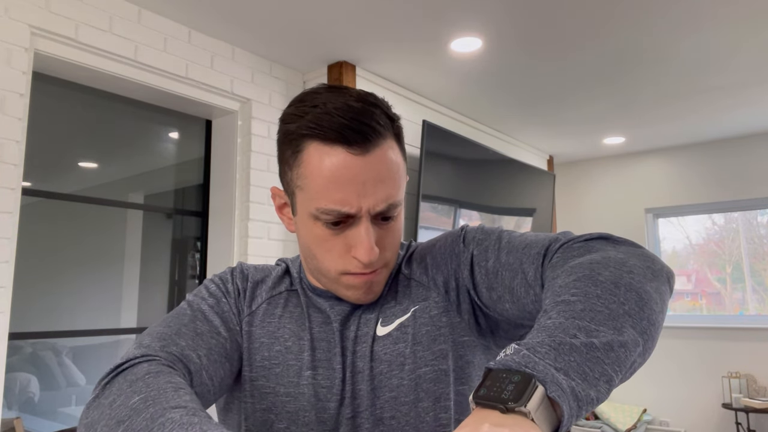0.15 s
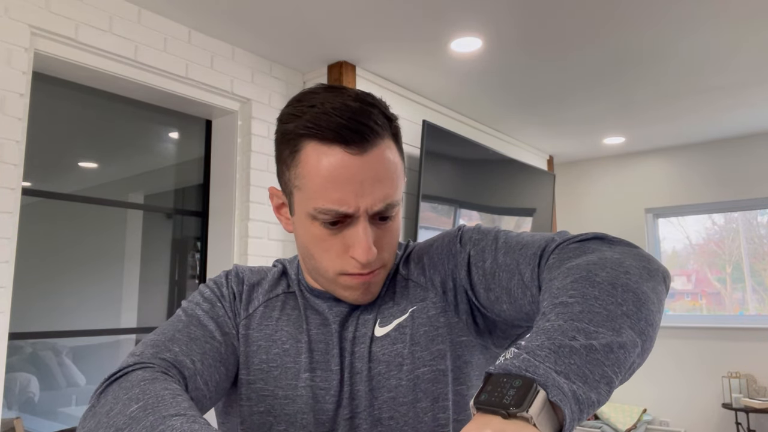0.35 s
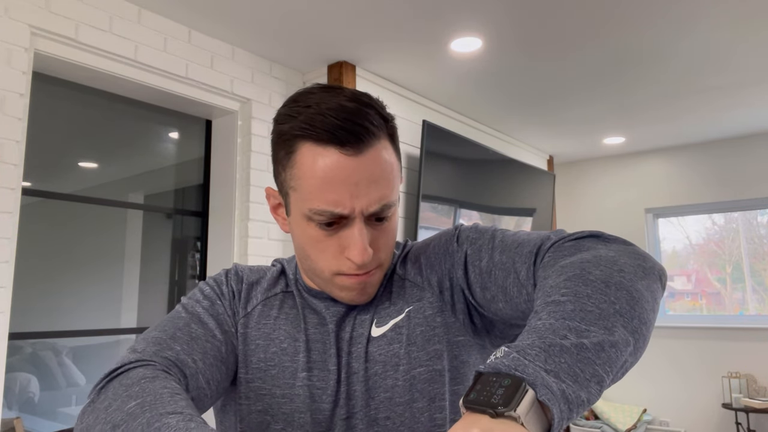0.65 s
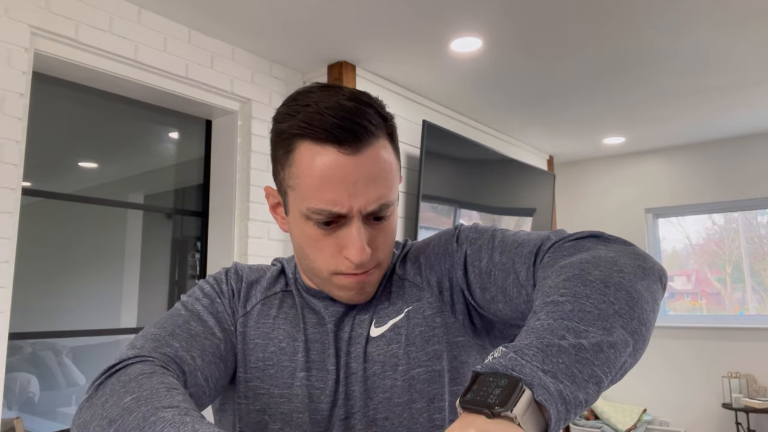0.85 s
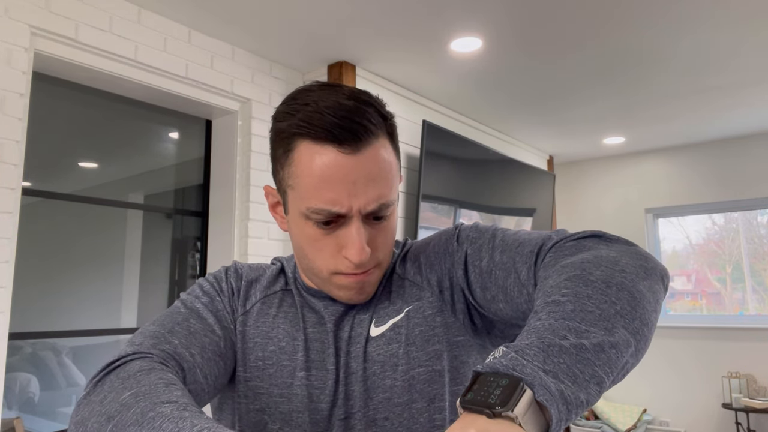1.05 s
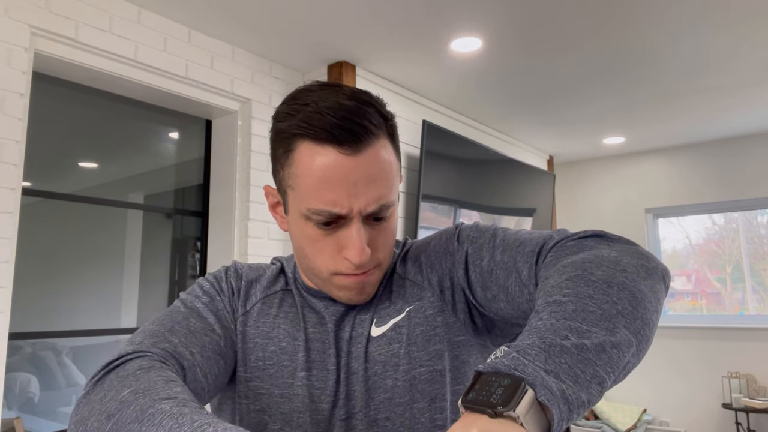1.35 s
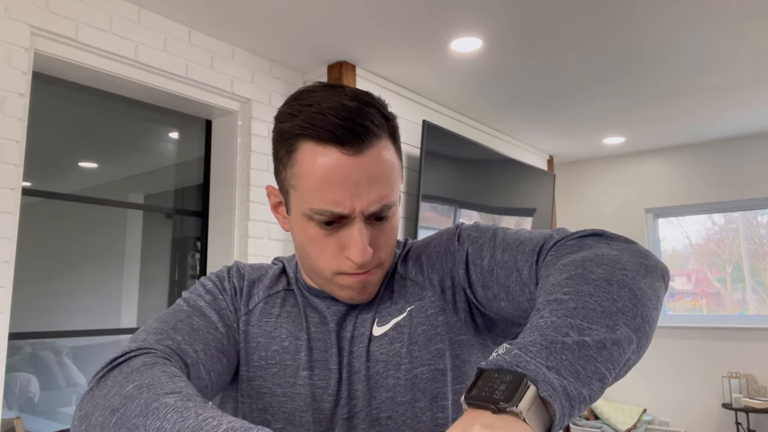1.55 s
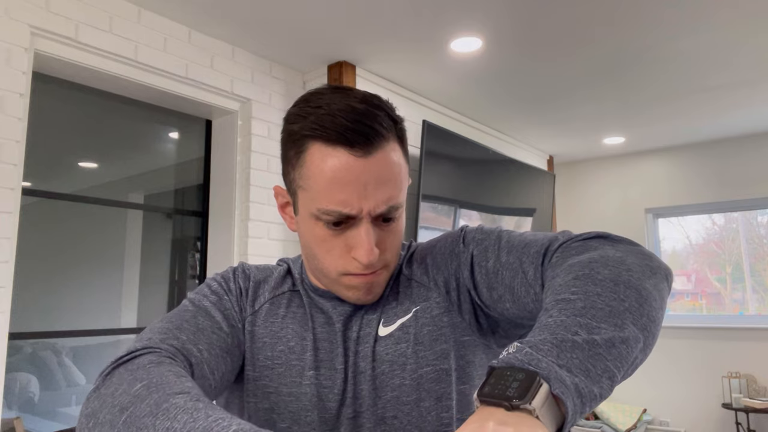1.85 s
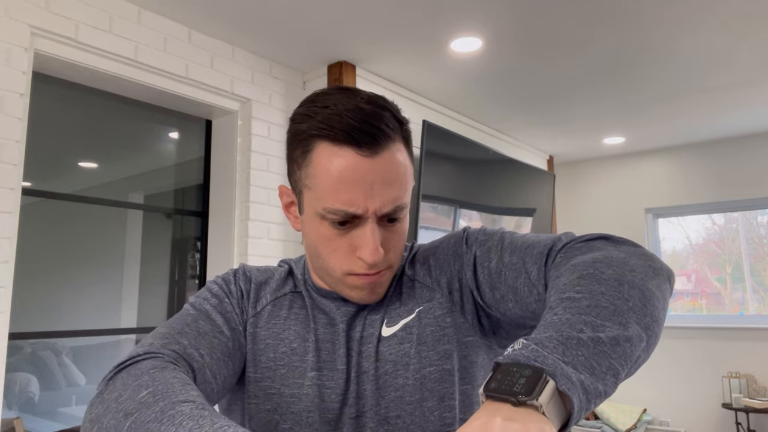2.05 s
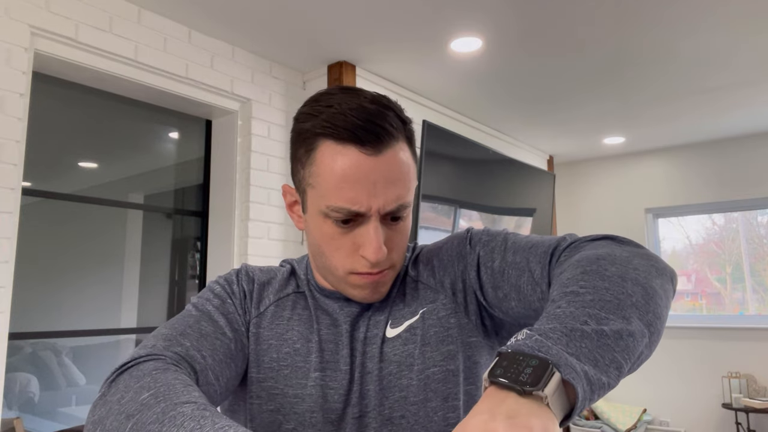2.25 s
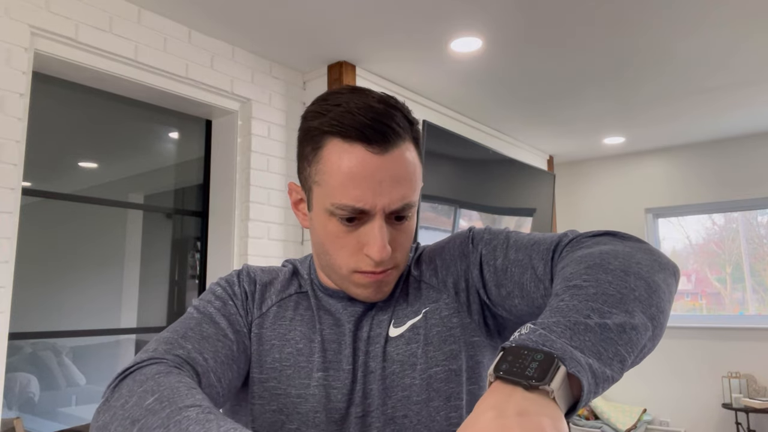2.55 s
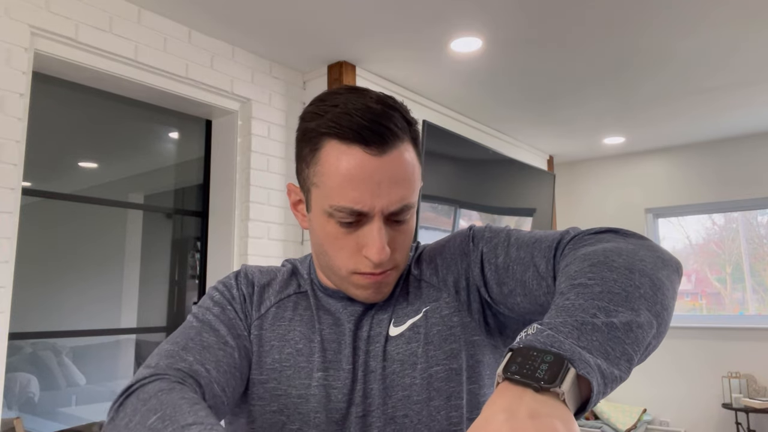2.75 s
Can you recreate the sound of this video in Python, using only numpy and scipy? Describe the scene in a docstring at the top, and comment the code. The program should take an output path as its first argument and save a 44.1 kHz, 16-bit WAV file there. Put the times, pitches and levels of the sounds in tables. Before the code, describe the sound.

Steel hand tools click and scrape on thin metal tabs at a table, sparse at first, sharp clacks around one second, a quieter pause, then another hard click near the end; lively room, close stereo microphones.

```python
"""In a hard-walled room, steel tools click and scrape on the tabs of a thin metal sheet on a table.
Each contact is roughened, shaped noise that excites the sheet's damped modes and the room's decaying tail;
low damped tones knock under some contacts, and ventilation rumbles softly as steady filtered noise.
A pair of microphones hears it all, the right one a little later above 500 Hz."""
import sys
import numpy as np
from scipy import signal
from scipy.fft import rfft, irfft, next_fast_len
from scipy.io import wavfile
from scipy.ndimage import uniform_filter1d

SR = 44100
rng = np.random.default_rng(int(sys.argv[2]) if len(sys.argv) > 2 else 0)


def transcribe(signal):
    """Save signal, clipped to [-1, 1], as a 16-bit WAV file at the path in sys.argv[1]."""
    frames = np.atleast_2d(signal).T
    limited = np.clip(frames, -1, 1)
    pcm = np.round(limited * 32767).astype(np.int16)
    wavfile.write(sys.argv[1], SR, pcm)


def volts_from_db(level):
    """Convert decibel levels to linear amplitude ratios."""
    exponent = np.asarray(level, float) / 20
    return 10 ** exponent


N = 127890  # length in samples

# Ventilation noise spectrum: (f/Hz, relative level/dB)
AIR_SPECTRUM = [(12, -53), (20, -17), (53, -13.5), (77, -1.5), (117, -11), (147, -2), (179, -5.5),
                (361, -8.5), (393, -15), (465, -7.5), (506, -22), (551, -18.5), (634, -21.5), (709, -19),
                (1080, -29.5), (1560, -31.5), (1740, -35), (2660, -45.5), (3830, -47), (6000, -55.5),
                (8650, -54), (11800, -57), (16500, -81)]
AIR_RMS_DB = -54.5  # before the microphones

# Reverberation time of the room: (f/Hz, t60/s)
ROOM_T60 = [(300, 0.93), (1000, 0.49), (2500, 0.39), (5000, 0.35), (8000, 0.32), (12000, 0.31),
            (16000, 0.078)]
# Room tail relative to the direct sound of a contact: (f/Hz, level/dB)
ROOM_LEVEL = [(300, -2.5), (1000, -2.5), (2500, 1), (6000, -9.5), (12000, -7.5)]
ROOM_RISE_S = 0.005  # time constant of the room's build-up

# Dull knocks under some of the contacts, probably the table: (t/s, f/Hz, level/dB, t60/s)
KNOCKS = [(.397, 937, -37, 0.064), (.397, 691, -46.5, 0.21), (.992, 873, -30.5, 0.1),
          (.992, 338, -43, 0.23), (.992, 674, -44, 0.18), (1.870, 351.7, -47, 0.32),
          (1.918, 693, -53.5, 0.28), (2.677, 365.3, -47.5, 0.43), (2.677, 656.2, -42.5, 0.26)]
KNOCK_RISE_S, KNOCK_ROOM_DB = 0.0044, -7  # rise time constant; tail over direct sound

# Mode frequencies of the sheet: (f/Hz)
MODE_HZ = [366, 610, 657, 855, 1022, 1213, 1372, 1743, 1898, 2064, 2175, 2327, 2379, 2502, 3003, 3492, 3588,
           3837, 4100, 4162, 4787, 5360, 5468, 5631, 5766, 5918, 6303, 6405]
# Relative mode levels, in the same order: (level/dB)
MODE_DB = [-4, -6, -9.5, -12.5, -9, -3, -4, 0.5, -10, -3.5, -8, 3.5, -8, -7.5, 1, -2, 1.5, -7.5, -5.5, -11,
           -13, -7.5, -4, -10.5, -9.5, -10, -4, -6.5]
# Decay time of the modes: (f/Hz, t60/s)
MODE_T60 = [(370, .6), (1200, 0.47), (2500, 0.12), (4000, 0.26), (6400, 0.08)]
TWIN_SPREAD_HZ = 9  # standard deviation of the offset of each mode's twin
MODE_SCATTER_DB, RING_RISE_S = 1.5, 0.0058  # new draw of levels at each contact; rise time constant
COLOUR_SHARE = 0.4  # how far the ring takes the contact's colour
HUMP_Q, HUMP_DB = 45, 9  # sharpness and height of the modes' humps in the contact noise

# Broad humps and valleys that the sheet gives every contact: (f/Hz, level/dB)
BODY = [(250, -1.5), (350, 1.5), (520, -2.5), (650, 5.5), (870, 0.5), (1200, 3.5), (1500, 1), (1750, 2.5),
        (2250, -1.5), (2700, -2), (3000, 0.5), (3250, -1.5), (3900, 1.5), (4600, -2.5), (5500, 0),
        (6400, 1), (7100, -3), (8600, 2), (10200, -1.5), (11600, -0.5)]
# Frequencies at which the colour of a contact is set; 6.2 kHz is the reference: (f/Hz)
COLOUR_HZ = (350, 900, 2200, 3800, 6200, 11000)
# Further fall of a contact's colour towards 150 Hz and towards 16 kHz: (level/dB, level/dB)
EDGES_DB = (-23.5, -11)
FADE_T60 = 0.05  # s, force after the chatter or stroke

# Scrapes: (start t/s, end t/s, start level/dB, end level/dB, all before the sheet's colour;
# then level/dB over that at 6.2 kHz for 350 Hz, 900 Hz, 2.2 kHz, 3.8 kHz and 11 kHz)
SCRAPES = [(.03, 0.056, -74, -79.5, 2, -20, 3, 1.5, -13), (.188, 0.228, -65, -74, -4, 3.5, -4, -2.5, -6),
           (.462, .492, -60, -40.5, -7, 8.5, -3.5, -4, -11.5),
           (.654, .70, -54, -52.5, -30, -13, -33, -0.5, -7), (.968, 1.014, -69, -18, -21, 2, 0.5, 4, -33.5),
           (1.595, 1.598, -69, -75, -9, -1, -13, 6, -11.5), (1.632, 1.653, -62, -70, -12, -5, -5, -18, -10),
           (2.548, 2.625, -64.5, -57, 7, 11.5, -8, -1.5, -9.5),
           (2.64, 2.683, -67.5, -31.5, 10.5, 0, -1.5, 2, -12.5)]
SCRAPE_RING_DB, GRIT_DB = -22, 3  # ring before its common trim; depth setting of the roughness

# Clicks: (full-force t/s, level/dB at 6.2 kHz before the sheet's colour;
# then level/dB over that for 350 Hz, 900 Hz, 2.2 kHz, 3.8 kHz and 11 kHz;
# chatter t/s counted from the start of the rise, ring level/dB before its common trim)
CLICKS = [(0.3975, -55, 8, 25, 5.5, 1, -17, 0.018, -22), (0.7286, -35, -15.5, -15, -6, -18, -8, 0.015, -16),
          (0.9951, -19, -14, 2.5, 0, 4, -6, 0.008, -13),
          (1.1149, -13, -26, -21, -11.5, -6, -5, 0.0077, -19.5),
          (1.1777, -28.5, -31, -26, -15, -5.5, -7, 0.011, -32.5),
          (1.6841, -59, -4.5, -11.5, -9, -13, -21, 0.01, -9),
          (1.708, -45.5, -16, 2, 2.5, -1, -5, 0.016, -9), (1.8696, -58, 3, 13.5, 0, 15, -13, 0.0075, 3.5),
          (1.9185, -34.5, -11.5, -3.5, -1.5, 1.5, -13.5, 0.0083, -13.5),
          (2.2002, -41.5, -31, -2, -10.5, -13, -12, 0.015, -10),
          (2.6294, -45.5, -1.5, 11, -13.5, -4, -12.5, 0.013, -11),
          (2.6779, -14, -33, -15.5, -10.5, -2, -13.5, 0.013, -11.5)]
CLICK_RISE_S, CHATTER_DB = 0.002, 3  # linear rise; depth setting of the roughness

# Likeness of the two microphones: (f/Hz, correlation)
ALIKE = [(25, .7), (60, .86), (150, .8), (300, .6), (600, .1), (2500, .1), (5500, .2), (7400, .4),
         (8500, .93), (12000, .93)]
# Left microphone over right: (f/Hz, level/dB)
LEFT_OVER_RIGHT = [(150, -.5), (300, 1), (1000, 0), (2500, -1.5), (4000, -3.5), (6200, -5), (7300, -3),
                   (8200, 1), (12000, 0)]
LAG_S, TOP_HZ = 0.000168, 16400  # delay of the right microphone above 500 Hz; upper band limit


def along(points, hz):
    """Linear interpolation of (f/Hz, value) points on a nearly logarithmic frequency axis."""
    f, v = np.transpose(points)
    return np.interp(np.log(hz + 1), np.log(f + 1), v)


def filtered(x, response):
    """Linear filtering: the spectrum is multiplied by a response of frequency."""
    m = next_fast_len(x.shape[-1] + 8192)
    spectrum = rfft(x, m) * response(np.fft.rfftfreq(m, 1 / SR))
    return irfft(spectrum, m)[..., :x.shape[-1]]


def unit(x):
    """Normalization to an rms value of 1."""
    return x / np.sqrt(np.mean(x ** 2) + 1e-20)


def placed(sound, s):
    """Superposition in time: the sound starts at s seconds in a silent stretch of the scene's length."""
    return np.pad(sound, ((0, 0), (round(s * SR), N)))[:, :N]


def air():
    """Stationary broadband noise: ventilation rumble with a faint hiss."""
    white = rng.standard_normal((2, N))
    return volts_from_db(AIR_RMS_DB) * unit(filtered(white, lambda hz: volts_from_db(along(AIR_SPECTRUM, hz))))


def room_tail():
    """Diffuse reverberation: a fresh pair of noise tails whose decay rate depends on frequency."""
    hz, t, z = signal.stft(rng.standard_normal((2, SR // 2)), SR, nperseg=256)
    decay = volts_from_db(-60 * t / along(ROOM_T60, hz)[:, None])
    tail = signal.istft(z * decay, SR, nperseg=256)[1][:, :SR // 2]
    tail = tail * (1 - np.exp(-np.arange(SR // 2) / SR / ROOM_RISE_S))
    return tail / np.linalg.norm(tail[0])  # left tail has energy 1


def in_room(sound, tail):
    """Convolution with an impulse response: direct sound plus reverberant tail."""
    answer = tail.copy()
    answer[:, 0] += 1
    return signal.fftconvolve(sound, answer, axes=1)


def knocks():
    """Damped oscillation: low tones decay exponentially, the second view a quarter cycle behind."""
    out, t = np.zeros((2, N)), np.arange(SR // 2) / SR
    for s, hz, db, t60 in KNOCKS:
        phase = 9 * rng.standard_normal() - np.c_[[0, np.pi / 2]]
        decay = volts_from_db(db - 60 * t / t60) * (1 - np.exp(-t / KNOCK_RISE_S))
        tone = decay * np.sin(2 * np.pi * hz * t + phase)
        out = out + placed(in_room(tone, volts_from_db(KNOCK_ROOM_DB) * room_tail()), s)
    return out


def sheet_ring(colour):
    """Modal superposition with beats: each mode is a close pair of decaying tones, drawn anew each time."""
    hz, t = np.array(MODE_HZ)[:, None], np.arange(SR // 2) / SR
    draw = rng.standard_normal((6, len(hz), 1))
    # the second view is about a quarter cycle behind
    phase = np.array([9 * draw[1], 9 * draw[1] - np.pi / 2 + 0.5 * draw[2]])
    twin_hz = hz + TWIN_SPREAD_HZ * draw[5]
    main = np.sin(2 * np.pi * hz * t + phase)
    twin = 0.4 * np.sin(2 * np.pi * twin_hz * t + 9 * draw[3:5])
    start_db = np.c_[MODE_DB] + COLOUR_SHARE * along(colour, hz) + MODE_SCATTER_DB * draw[0]
    level_db = start_db - 60 * t / along(MODE_T60, hz)
    return np.sum(volts_from_db(level_db) * (main + twin), axis=1) * (1 - np.exp(-t / RING_RISE_S))


def humps(hz):
    """Resonant forced response: damped resonances of alternating sign add to the direct path."""
    total = 0
    for k, mode_hz in enumerate(MODE_HZ):
        damping = 1j * hz * mode_hz / HUMP_Q
        total = total + (-1) ** k * damping / (mode_hz ** 2 - hz ** 2 + damping)
    return 1 + volts_from_db(HUMP_DB) * total


def contact(s, envelope, colour_db, ring_db, rough_db):
    """Source and resonator: rough contact noise in a room, with a ring set off at the envelope's peak."""
    *lows, high = colour_db
    low_edge, high_edge = (150, lows[0] + EDGES_DB[0]), (16000, high + EDGES_DB[1])
    colour = [low_edge, *zip(COLOUR_HZ, (*lows, 0, high)), high_edge]
    white = rng.standard_normal((2, SR // 4))
    lumps = np.repeat(rng.standard_normal(SR // 80), 20)[:len(envelope)]
    # the constant offsets the mean energy that the unevenness adds
    force = envelope * volts_from_db(rough_db * uniform_filter1d(lumps, size=15) - rough_db ** 2 / 9)

    def sheet_colour(hz):
        level_db = along(colour, hz) + along(BODY, hz) - 3.65 * (hz < 6800)
        return volts_from_db(level_db) * humps(hz)

    noise = filtered(white, sheet_colour)[:, :len(envelope)] * force
    tail = filtered(room_tail(), lambda hz: volts_from_db(along(ROOM_LEVEL, hz)))
    sound = in_room(noise, tail)
    peak = np.argmax(envelope)
    ring = envelope.max() * volts_from_db(ring_db - 7.5) * sheet_ring(colour)  # common trim of -7.5 dB
    sound[:, peak:][:, :SR // 2] += ring[:, :sound.shape[1] - peak]
    return placed(sound, s)


def scrapes():
    """Sliding friction: noise whose level changes steadily in dB along the stroke, then decays."""
    out, lift = np.zeros((2, N)), np.arange(SR // 10) / SR
    for start, end, first_db, last_db, *colour_db in SCRAPES:
        drag_db = np.linspace(first_db, last_db, round((end - start) * SR))
        stroke = volts_from_db(np.r_[drag_db, last_db - 60 * lift / FADE_T60])
        stroke = stroke * np.minimum(np.arange(len(stroke)) / SR / 0.004, 1)  # 4 ms rise
        out = out + contact(start, stroke, colour_db, SCRAPE_RING_DB, GRIT_DB)
    return out


def clicks():
    """Impulsive excitation: quick rise, a few milliseconds of chatter, exponential fade."""
    out, t = np.zeros((2, N)), np.arange(SR // 8) / SR
    for s, db, *colour_db, chatter_s, ring_db in CLICKS:
        fade_db = db - 60 * np.maximum(t - chatter_s, 0) / FADE_T60
        shape = np.minimum(t / CLICK_RISE_S, 1) * volts_from_db(fade_db)
        out = out + contact(s - CLICK_RISE_S, shape, colour_db, ring_db, CHATTER_DB)
    return out


def scene():
    """Linear superposition of all sources, in two views of the same sound field."""
    return air() + knocks() + scrapes() + clicks()


def low_pass(x):
    """Removes everything above the highest recorded frequency."""
    return signal.sosfilt(signal.butter(12, 16790, fs=SR, output="sos"), x)


def record(dry):
    """Interchannel coherence and delay: the microphones agree in bass and high treble, the right one lags."""
    def shares(hz):
        # cos(2 * angle) is the correlation of the sum and the difference
        angle = np.arccos(np.clip(along(ALIKE, hz), -1, 1)) / 2
        return np.array([np.cos(angle), np.sin(angle)])

    def balance(hz):
        half_db = along(LEFT_OVER_RIGHT, hz) / 2
        late = np.exp(-2j * np.pi * hz * LAG_S * (hz > 500))
        return np.array([volts_from_db(half_db), volts_from_db(-half_db) * late])

    common, different = filtered(filtered(dry, shares), lambda hz: hz < TOP_HZ)
    mix = filtered(np.array([common + different, common - different]), balance)
    return low_pass(mix)


dry = scene()
out = record(dry)
transcribe(out)
```